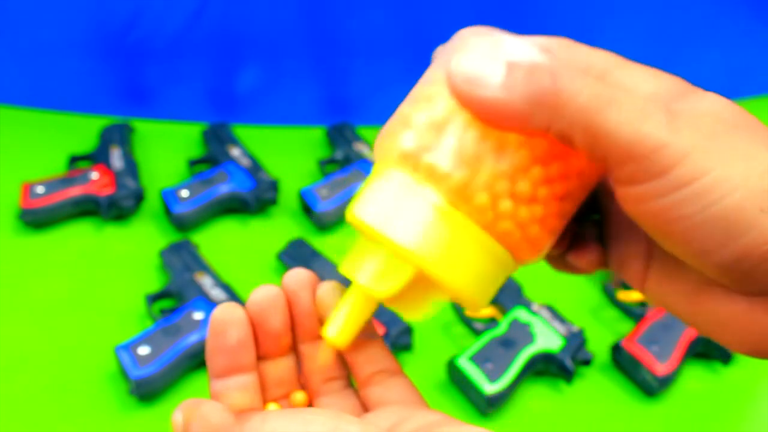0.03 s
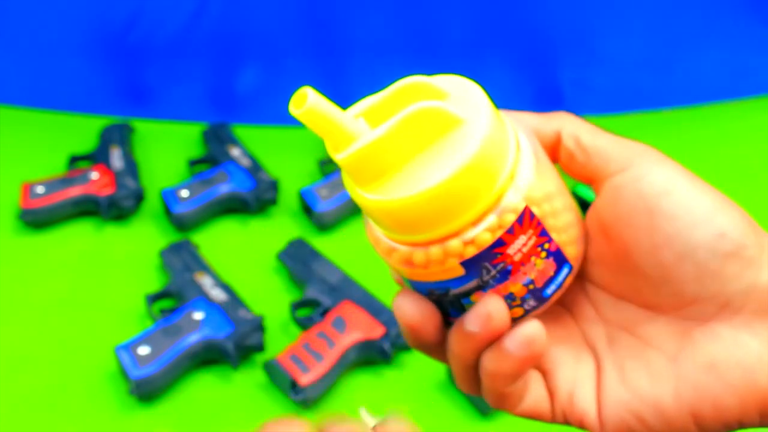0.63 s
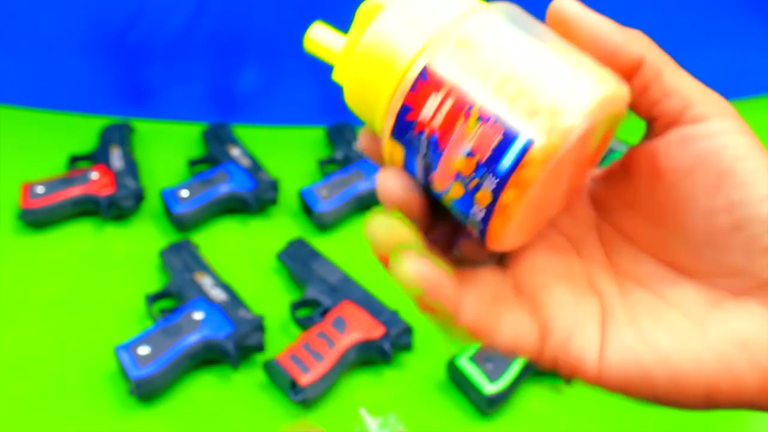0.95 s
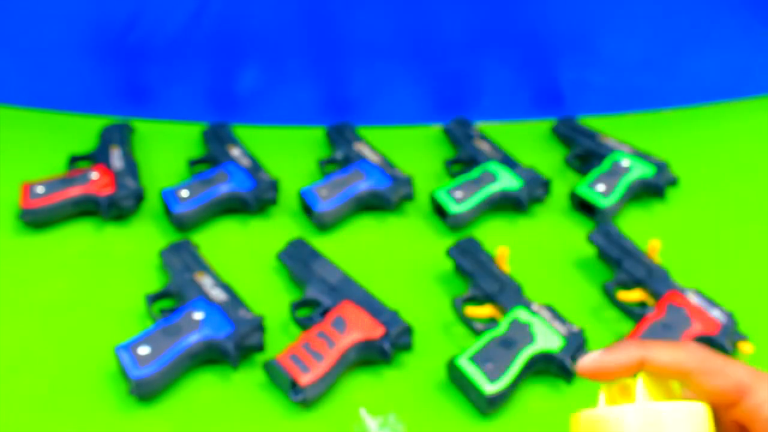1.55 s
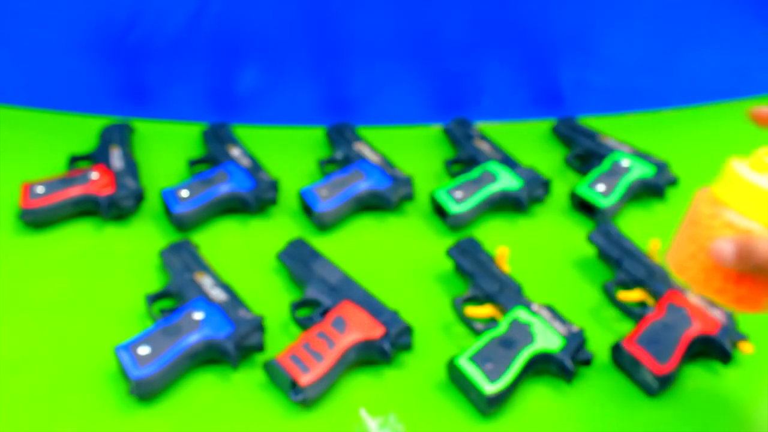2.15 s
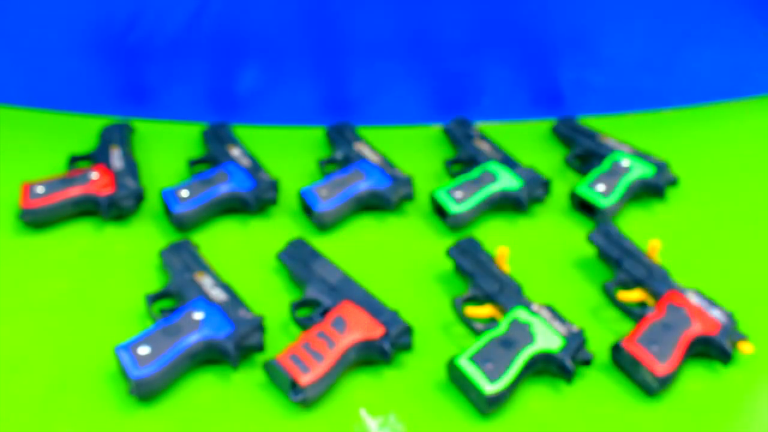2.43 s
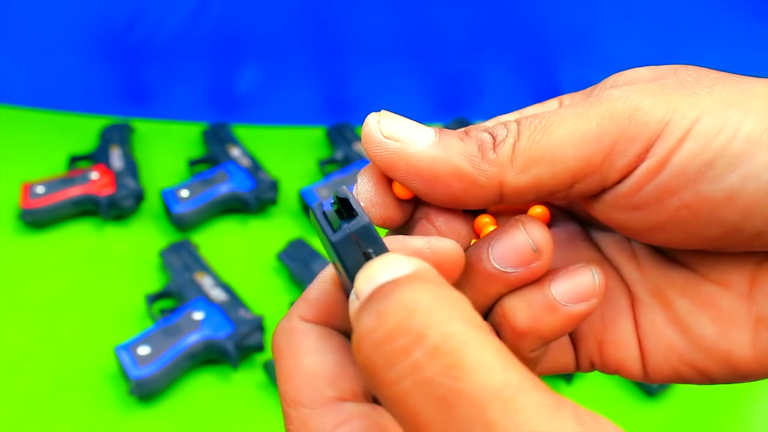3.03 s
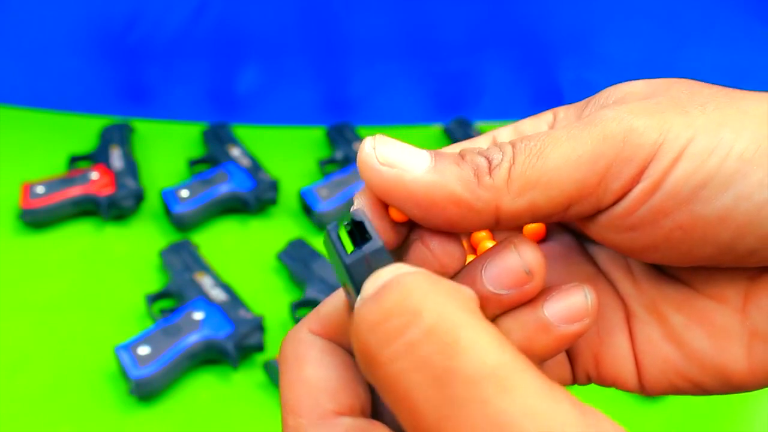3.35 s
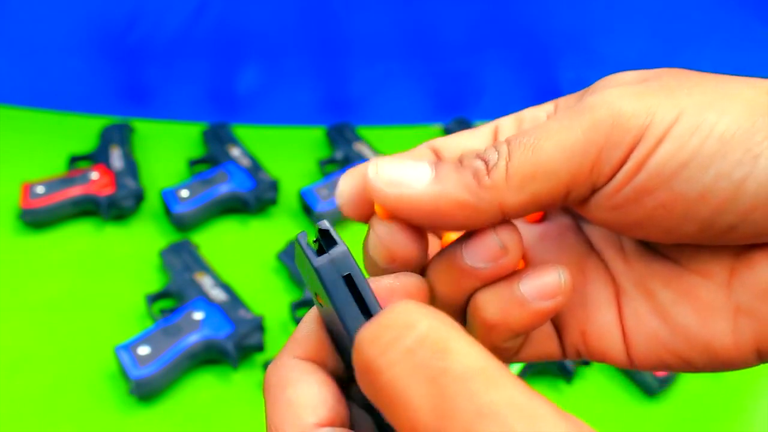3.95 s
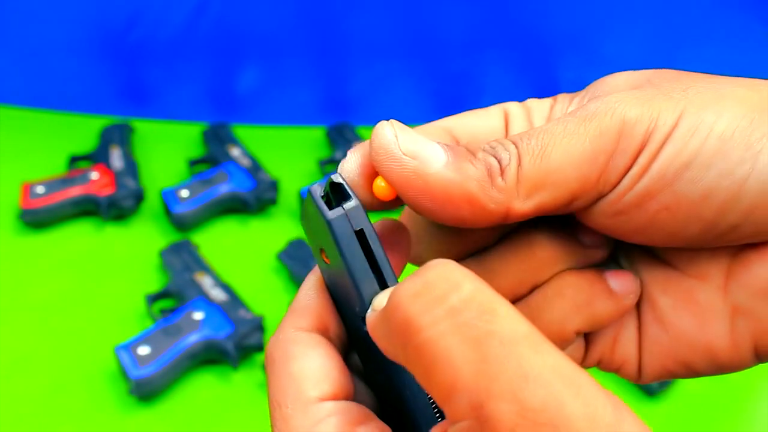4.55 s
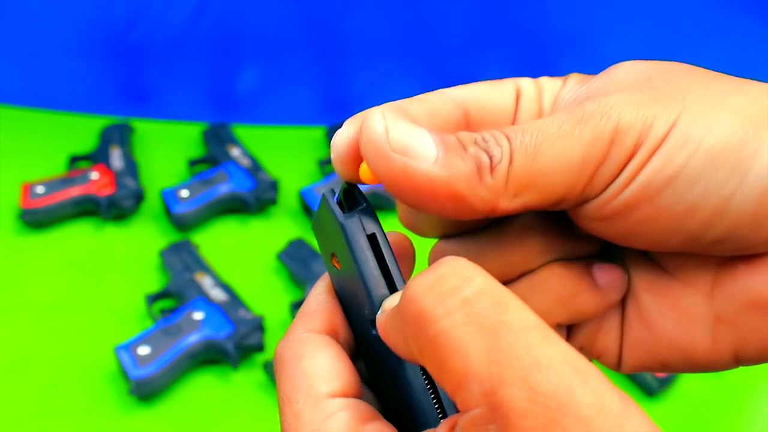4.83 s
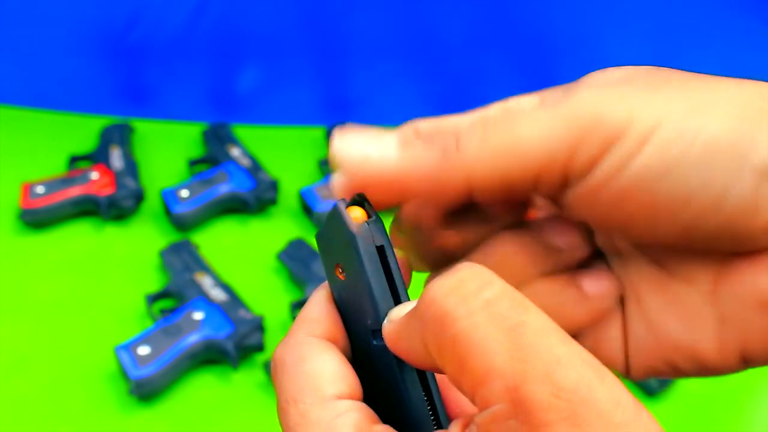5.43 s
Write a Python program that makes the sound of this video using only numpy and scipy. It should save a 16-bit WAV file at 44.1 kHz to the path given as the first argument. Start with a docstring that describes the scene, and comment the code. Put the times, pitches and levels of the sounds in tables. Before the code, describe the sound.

From the start, small plastic pellets rattle out of a plastic bottle into a palm, ticking against its walls and each other. The clatter is loudest around 0.5 seconds, as the bottle tips upright and the pellets slide back, and surges again at about 1.2 seconds. The bottle bumps softly on a cloth-covered table around 1.6 seconds, with lighter rattles near 1.9 and 2.4 seconds. Fingers rub pellets together in faint, scratchy ticks at 2.5 seconds and again from 3.5 to 3.9. After a lull, a few small, sharp clicks come between 5.2 and 5.4 seconds as pellets are pressed into a toy magazine, followed by one tiny scrape near 5.7. Everything is close to the microphone in a small room with little echo. A steady, very high electronic whine, soft hiss and faint hand rumble continue throughout.

```python
"""Plastic pellets rattle out of a plastic bottle into a palm, hitting its walls and each other.
The bottle is tipped upright, the pellets slide back, and it is set aside with soft bumps.
Then fingers rub pellets together and press them into a toy magazine with faint clicks.
A small room, microphone hiss, hand rumble and a steady, very high electronic whine lie under it all."""
import sys
import numpy as np
from scipy import signal
from scipy.fft import rfft, irfft, next_fast_len
from scipy.io import wavfile

SR = 44100
rng = np.random.default_rng(int(sys.argv[2]) if len(sys.argv) > 2 else 0)


def output_pcm(signal):
    """Save a mono or channel-first signal as 16-bit PCM at the path in sys.argv[1].

    Samples are clipped to [-1, 1] before scaling.
    """
    pcm = np.clip(np.atleast_2d(signal).T, -1, 1) * 32767
    wavfile.write(sys.argv[1], SR, np.round(pcm).astype(np.int16))


N = 251370

# Tone colours, which say how strong each pitch is next to the others: f/Hz, level/dB
HISS_COLOUR = [(25, -13), (45, -21), (75, -6.5), (150, -0.5), (280, -2.5), (380, -2.5), (500, -5),
               (950, -9), (1800, -11.5), (3300, -14), (4400, -12.5), (5200, -14.5), (6300, -20),
               (12400, -24), (16000, -57)]
RUMBLE_COLOUR = [(20, -12), (45, 3), (75, 4), (120, 1), (250, -39.5)]
SCRAPE_COLOUR = [(1000, -2), (2100, 2), (4200, 4), (6500, 1), (8500, 1.5), (11500, 1.5), (13200, -2),
                 (14500, -39)]
CLATTER_COLOUR = [(150, -42.5), (280, -5.5), (390, 2), (550, -2), (1000, 1), (1800, 2), (2700, 0.5),
                  (4200, -1.5), (5300, 0), (6500, -10), (12000, -29)]
TICKING_COLOUR = [(600, -45), (2000, 10), (4000, 2), (5500, 5), (8000, 3.5), (11000, -1.5), (13500, -3),
                  (15000, -81)]
BUMP_COLOUR = [(200, -13.5), (330, -5.5), (430, 3), (520, -6.5), (800, -6), (2500, -43)]
HARD_TICK_COLOUR = [(1500, -21), (4000, 8), (7000, -1.0), (11000, 0.0), (13500, -17), (15000, -42)]
# The shape of the faint noise around the whine: distance from the tone f/Hz, level/dB
WHINE_NOISE_BAND = [(4, 0), (40, -14), (100, -24), (250, -48), (600, -110)]
# How long the room's echo takes to fade by 60 dB: f/Hz, fade/s
ROOM_FADE = [(200, 0.52), (2000, 0.088), (10000, 0.078)]
# Hand movements, each loudest at time t: t/s, level/dB, half length/s
HAND_MOVES = [(0.138, -48.5, 0.036), (0.246, -54.5, 0.056), (0.51, -63.5, 0.16), (1.22, -68, .15),
              (1.87, -67, .06), (2.46, -67, .06)]
# Pellets rubbing between the fingers: t/s, level/dB, rise/s, decay/s, centre f/Hz
FINGER_RUBS = [(2.457, -51, .002, 0.0036, 4800), (2.490, -44.5, 0.0044, .008, 4630),
               (2.51, -54, 0.055, 0.027, 5240), (2.526, -38, 0.0012, 0.01, 5900),
               (2.547, -41, 0.00076, 0.0024, 7000), (2.551, -41, 0.00052, 0.0019, 7000),
               (3.535, -55.5, .008, .006, 6900), (3.547, -45, .0015, 0.018, 5400),
               (3.709, -50, .003, 0.007, 2120), (3.747, -48.5, 0.013, .01, 4100),
               (3.780, -41.5, 0.00041, 0.0061, 4730), (3.803, -46, .0003, .0015, 6500),
               (3.845, -49, .001, 0.0049, 4200), (3.872, -55.5, 0.0094, 0.039, 4300),
               (3.898, -45.5, .001, 0.0035, 4400), (3.923, -52, .0005, 0.0018, 7000),
               (5.668, -49, 0.0008, 0.0048, 5350)]
# The notes of the magazine's shell: f/Hz, level/dB, time to fade by 60 dB/s
SHELL_NOTES = [(2540, -9, .012), (3800, -7, 0.018), (4200, -5, 0.01), (6150, -3, 0.0064), (6750, 3, 0.0071),
               (8700, -6, 0.0045), (10100, -5, .004)]
# A pellet snapping past the magazine's lip: t/s, level/dB, contact time/s
LIP_SNAPS = [(5.170, -38, 0.00082), (5.194, -41, .0022), (5.289, -31, 0.00081), (5.373, -24, .0005),
             (5.391, -42, .001)]
# The two clicks of each snap, passing the lip and settling in: delay/s, added level/dB
CLICK_PAIR = [(0, -0.5), (.0034, -11.5)]
# The bottle touching the table: t/s, level/dB, decay/s
TABLE_BUMPS = [(1.612, -46.5, .022), (1.641, -46, .014), (1.690, -47, .011)]
# The notes at which each part of the bottle and its air ring: f/Hz, width/Hz, level/dB
SPOUT_NOTES = [(412, 140, -4.5), (643, 73, 8.5), (840, 120, 3), (2080, 260, -4), (3700, 300, 4),
               (4420, 170, 4), (4930, 280, 2), (5900, 260, -11)]
SIDE_NOTES = [(370, 120, -4.5), (890, 240, -7.5), (1260, 61, 1), (1570, 60, -3.5), (1670, 110, 2.5),
              (2100, 150, 1.5), (2440, 150, 6), (2750, 200, 5.5), (3130, 130, 2.5), (4000, 260, 3.5),
              (4200, 170, 3), (4900, 350, -2.5)]
BASE_NOTES = [(403, 210, 5), (1100, 57, 3), (1290, 73, -10), (1700, 99, 3), (2010, 120, -1.5),
              (2400, 130, 6), (3060, 130, 6.5), (3440, 370, 7.5), (3870, 220, 8), (4190, 98, 14),
              (4900, 1200, 7), (5230, 150, 3), (6580, 370, 10.5)]
# Single pellets striking hard: t/s, level/dB, tick level next to the wall's knock/dB
HARD_STRIKES = [(0.066, -29, -4), (0.174, -29, 0), (0.312, -32.5, -13), (0.363, -37.5, 0),
                (0.440, -24, -13), (0.455, -26, -13), (0.488, -26, -13), (0.523, -19, -16),
                (0.543, -18.5, -11), (0.569, -23.5, -17), (0.59, -19, -12), (0.615, -24, -22),
                (0.683, -36, -17), (0.765, -40, 3), (0.78, -42, -7), (0.949, -38.5, -10), (1.173, -27, 4),
                (1.216, -20, -8), (1.333, -29, 8), (1.513, -44, 1), (1.642, -37, -15), (1.684, -38, 10),
                (1.691, -33.5, -8), (1.912, -33, 8), (1.953, -37, -0.5), (1.972, -39, -8)]
# Where the heap lies as the bottle tilts: t/s, place (0 spout, 1 side wall, 2 base)
HEAP_PLACE = [(0, 0.16), (.41, 0.45), (.54, 1.05), (.64, 1.4), (.74, 2.2), (1.09, 0.54), (1.17, 1.6),
              (1.23, 1), (1.265, 2.14), (1.45, 1.6)]
# Jolts that throw many pellets at once: t/s, clatter level/dB, ticking level/dB, length/s
HEAP_JOLTS = [(0.0, -39.5, -62.5, 0.017), (0.024, -44.5, -43, 0.011), (0.046, -42, -60, .02),
              (0.104, -41.5, -68, 0.027), (0.16, -43.5, -48, 0.024), (0.247, -41, -67, 0.03),
              (0.399, -41, -63, 0.016), (0.44, -36.5, -64, 0.025), (1.253, -36, -44, 0.022),
              (1.287, -40, -41.5, 0.019), (1.924, -50, -68, 0.0078)]
# Tilts and shakes that slide the heap: t/s, swell/s, hold/s, settle/s, clatter level/dB, ticking level/dB
HEAP_SLIDES = [(-0.01, 0.0089, 0.059, 0.072, -44, -44), (0.064, 0.028, 0.23, 0.079, -46.5, -55),
               (0.402, 0.14, 0.076, 0.066, -33, -46.5), (0.70, 0.018, 0.082, .45, -57.5, -68),
               (0.894, 0.026, 0.013, 0.27, -57, -66), (1.068, .045, 0.12, 0.15, -39.5, -49.5),
               (1.239, 0.0091, 0.061, 0.084, -41, -42), (1.466, 0.046, .01, 0.25, -56.5, -63.5),
               (1.599, 0.03, .01, 0.16, -50, -55.5), (1.857, 0.096, 0.012, 0.13, -49.5, -51.5),
               (2.303, 0.042, 0.21, 0.039, -57, -64)]

WHINE_HZ, TOP_HZ = 15056, 17000
SWELL_DB, SETTLE_DB = 12.5, 16  # a slide's growth over its swell, and its drop per settle time
BREAKAWAY_S = .006  # the heap takes this long to start moving
CREEP_PER_S, RUSH_PER_S = 650, 5000  # hits a second in a creeping heap, and extra hits at full flow
CHATTER_S = 0.0051  # a hard contact fades by 60 dB in this time


def amp(db):
    """Turn decibels into a number to multiply by."""
    return 10 ** (np.asarray(db) / 20)


def unit(x):
    """Scale x to an average power of 1."""
    return x / np.sqrt(np.mean(x ** 2) + 1e-20)


def along(points, hz):
    """Read between the rows of a (frequency, value) table, giving each octave equal space."""
    freqs, values = np.transpose(points)
    return np.interp(np.log(hz + 1), np.log(freqs + 1), values)


def filtered(x, gain):
    """Scale each frequency f in x by gain(f), with no ringing ahead of a hit."""
    size = 2 * next_fast_len(len(x) // 2 + 4096)
    gains = np.maximum(gain(np.fft.rfftfreq(size, 1 / SR)), 1e-6)
    response = irfft(np.log(gains), size)
    # move the ringing from before each hit to after it
    response[1:size // 2] *= 2
    response[size // 2 + 1:] = 0
    return irfft(rfft(x, size) * np.exp(rfft(response)), size)[:len(x)]


def shaped(x, colour):
    """Give x a tone colour and an average power of 1."""
    return unit(filtered(x, lambda hz: amp(along(colour, hz))))


def add(track, s, sound):
    """Mix a sound into the track, starting at s seconds."""
    start = max(round(s * SR), 0)
    part = sound[:max(len(track) - start, 0)]
    track[start:start + len(part)] += part


def impacts(rate, spread_db):
    """Tiny random hits of uneven size, about `rate` of them a second."""
    chance = np.clip(rate / SR, 1e-4, 1) * np.ones(N)
    size = amp(spread_db * np.clip(rng.standard_normal(N), -2, 2)) * rng.choice([-1, 1], N)
    return unit((rng.random(N) < chance) * size / np.sqrt(chance))


def hiss():
    """Room air and the microphone make a steady hiss."""
    return amp(-58.0) * shaped(rng.standard_normal(N), HISS_COLOUR)


def whine():
    """A steady, very high whine with a faint, narrow band of noise around it."""
    level_noise, phase_noise = [shaped(rng.standard_normal(N), WHINE_NOISE_BAND) for _ in range(2)]
    tone = np.sin(2 * np.pi * WHINE_HZ * np.arange(N) / SR + .04 * phase_noise)
    return amp(-26.0) * unit((1 + .015 * level_noise) * tone)


def hand_rumble():
    """Resting hands rumble faintly, and each movement makes the rumble swell and fade."""
    now = np.arange(N) / SR
    moves = sum(amp(db) * np.exp(-((now - s) / half) ** 2) for s, db, half in HAND_MOVES)
    return (amp(-82) + moves) * shaped(rng.standard_normal(N), RUMBLE_COLOUR)


def room_echo(x):
    """The small room echoes x, and the high notes die first."""
    hz, t, noise = signal.stft(rng.standard_normal(SR // 3), SR, nperseg=256)
    fade = amp(-60 * t / along(ROOM_FADE, hz)[:, None])
    tail = signal.istft(noise * fade, SR, nperseg=256)[1]
    return signal.fftconvolve(x, tail / np.linalg.norm(tail))[:N]


def finger_rubs():
    """Pellets stick and slip on each other as the thumb picks one out."""
    out, t = np.zeros(N), np.arange(-SR // 20, SR // 10) / SR
    for s, db, rise, decay, centre_hz in FINGER_RUBS:
        slips = impacts(7000, spread_db=3.5)[:len(t)]
        # a looser grip rings lower and sounds duller
        ring = lambda f: 1 + amp(1.5) / (1 + (4 * (f - centre_hz) / centre_hz) ** 2)
        damping = lambda f: np.sqrt(1 + (f / (5.2 * centre_hz)) ** 2)
        scrape = unit(filtered(slips, lambda f: amp(along(SCRAPE_COLOUR, f)) * ring(f) / damping(f)))
        loudness = amp(db) * np.exp(-np.abs(t) / np.where(t < 0, rise, decay))
        add(out, s + t[0], loudness * scrape)
    return out


def magazine_clicks():
    """A pellet snaps past the lip and rings the shell, then settles in a moment later."""
    out, t = np.zeros(N), np.arange(SR // 20) / SR
    for s, db, contact in LIP_SNAPS:
        for delay, added_db in CLICK_PAIR:
            ring = np.zeros(len(t))
            for hz, level, fade in SHELL_NOTES:
                loudness = amp(level + rng.normal(0, 1.7) - 60 * t / fade)
                ring += loudness * np.sin(2 * np.pi * hz * rng.normal(1, 0.016) * t)
            crack = shaped(rng.standard_normal(len(t)) * amp(-60 * t / .005), SCRAPE_COLOUR)
            # a longer contact sounds duller, and so small a shell gives no bass
            tone = lambda f: 1 / (1 + (f * contact / 9) ** 3) / (1 + (1800 / (f + 1)) ** 4)
            snap = filtered(unit(ring) + amp(-3.5) * crack, tone)
            add(out, s + delay, amp(db + added_db) * snap / np.abs(snap).max())
    return out


def bottle_bumps():
    """Set on the cloth-covered table, the bottle gives only its lowest, hollow note."""
    out, t = np.zeros(N), np.arange(SR // 8) / SR
    for s, db, decay in TABLE_BUMPS:
        push = rng.standard_normal(len(t)) * np.exp(-t / decay)
        note = shaped(push, BUMP_COLOUR)
        add(out, s, amp(db) * note / np.abs(note).max())
    return out


def bottle_wall(hits, notes, knock_db):
    """The wall answers hits with ringing notes that stand out of a dull knock."""
    def gain(f):
        ringing = sum(amp(db) ** 2 / (1 + (2 * (f - hz) / width) ** 2) for hz, width, db in notes)
        return amp(along(CLATTER_COLOUR, f)) * np.sqrt(amp(knock_db) ** 2 + ringing)
    return unit(filtered(hits, gain))


def pellet_strikes():
    """A pellet that lands hard chatters for an instant: a sharp tick and a short ring of the wall."""
    out, t = np.zeros(N), np.arange(SR // 20) / SR
    for s, db, tick_db in HARD_STRIKES:
        contact = rng.standard_normal(len(t)) * amp(-60 * t / CHATTER_S)
        tick = shaped(contact, HARD_TICK_COLOUR)
        hit = bottle_wall(contact, SIDE_NOTES, knock_db=-13) + amp(tick_db) * tick
        add(out, s, amp(db) * hit / np.abs(hit).max())
    return out


def heap_slide(t, swell, hold, settle):
    """How much the heap moves, 0 to 1: it breaks loose at t = 0, speeds up, runs on and stops."""
    growth_db = SWELL_DB * np.minimum(t / swell - 1, 0)
    drop_db = SETTLE_DB * np.maximum(t - swell - hold, 0) / settle
    return np.clip(t / BREAKAWAY_S, 0, 1) * amp(growth_db - drop_db)


def pellet_rattle():
    """Pellets clatter on the wall and tick on each other, faster and louder as more of them move."""
    now, t = np.arange(N) / SR, np.arange(SR // 8) / SR
    clatter, ticking = np.zeros(N), np.zeros(N)
    for s, swell, hold, settle, clatter_db, ticking_db in HEAP_SLIDES:
        moving = heap_slide(now - s, swell, hold, settle)
        clatter = np.hypot(clatter, amp(clatter_db) * moving)
        ticking = np.hypot(ticking, amp(ticking_db) * moving)
    for s, clatter_db, ticking_db, length in HEAP_JOLTS:
        landing = (1 - np.exp(-t / 0.0014)) * np.exp(-(t / length) ** 4)
        add(clatter, s, amp(clatter_db) * landing)
        add(ticking, s, amp(ticking_db) * landing)
    rate = CREEP_PER_S + RUSH_PER_S * np.sqrt(clatter / clatter.max())
    hits = impacts(rate, spread_db=3)
    parts = [bottle_wall(impacts(rate * 0.43, spread_db=2.5), SPOUT_NOTES, knock_db=-2),
             bottle_wall(hits, SIDE_NOTES, knock_db=-3.5),
             bottle_wall(hits, BASE_NOTES, knock_db=-7)]
    # tilting passes the pellets from one part of the bottle to the next
    place = np.clip(np.interp(now, *np.transpose(HEAP_PLACE)), 0, 2)
    on_wall = sum(np.clip(1 - np.abs(place - k), 0, 1) * part for k, part in enumerate(parts))
    on_pellets = shaped(impacts(rate * .7, spread_db=3.5), TICKING_COLOUR)
    return clatter * on_wall + ticking * on_pellets


def scene():
    """All is close to one microphone; the magazine is closest, so it has the least echo."""
    bottle = pellet_rattle() + pellet_strikes() + bottle_bumps()
    loading = finger_rubs() + magazine_clicks()
    echo = amp(-18.5) * room_echo(bottle + amp(-6) * loading)
    background = hiss() + hand_rumble() + whine()
    return (bottle + loading + echo + background)[None]


def record(dry):
    """Cut away the very highest sounds, above TOP_HZ."""
    low_pass = signal.firwin(255, TOP_HZ, fs=SR, window="blackman")
    return signal.fftconvolve(dry, low_pass[None], mode="same", axes=1)


dry = scene()
out = record(dry)
output_pcm(out)
```